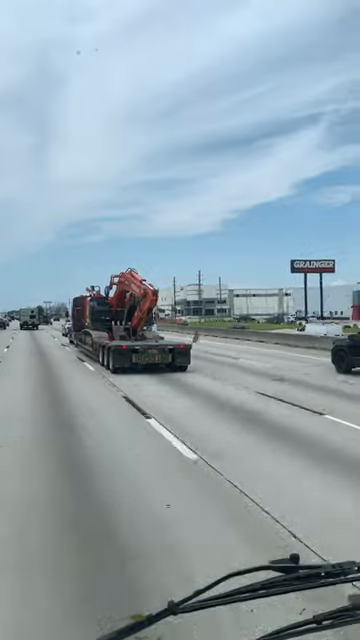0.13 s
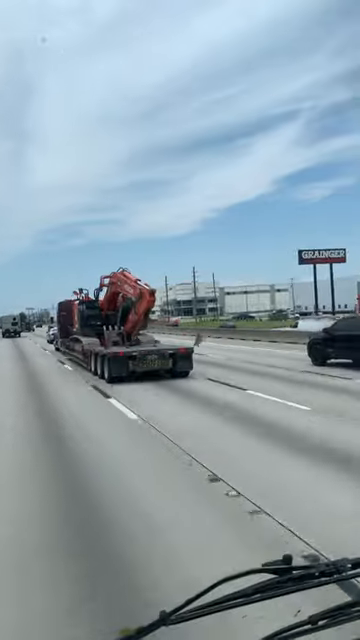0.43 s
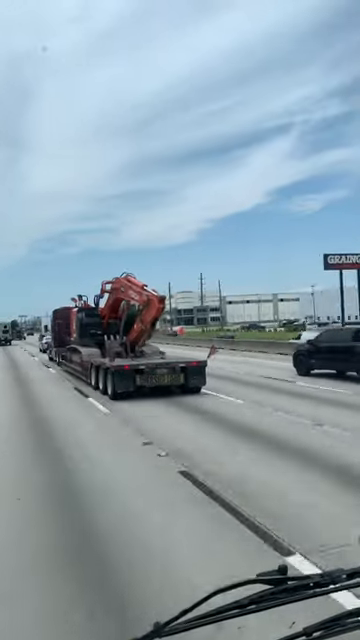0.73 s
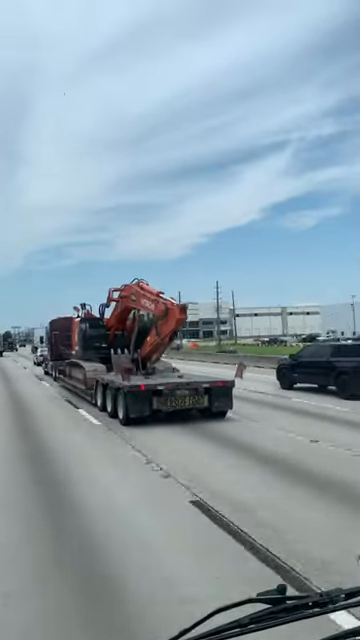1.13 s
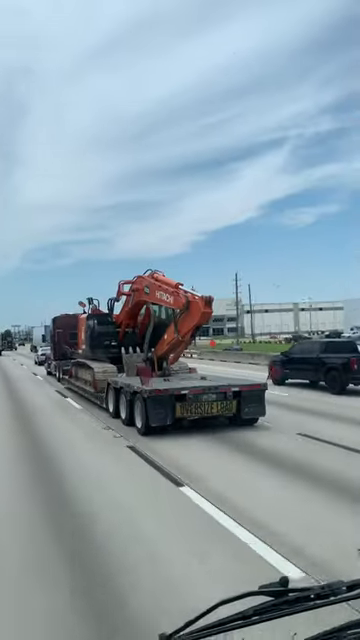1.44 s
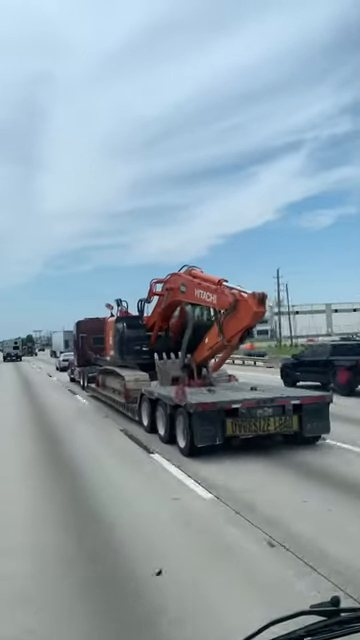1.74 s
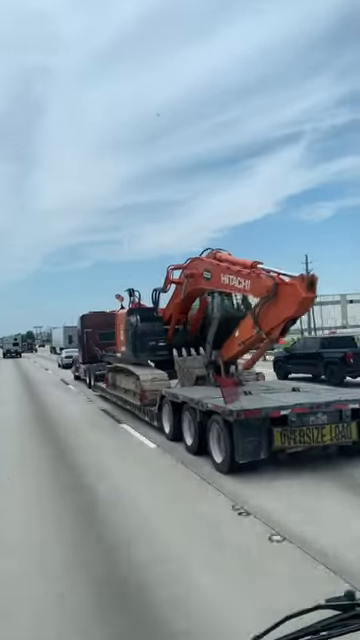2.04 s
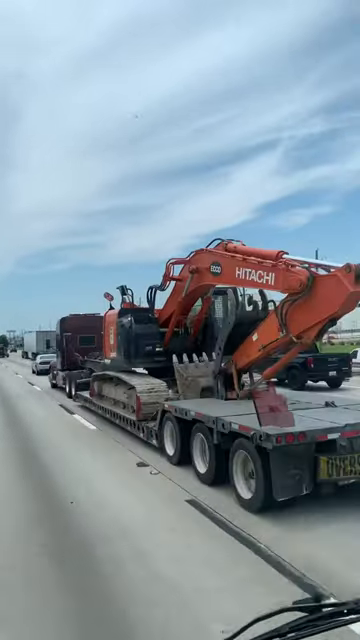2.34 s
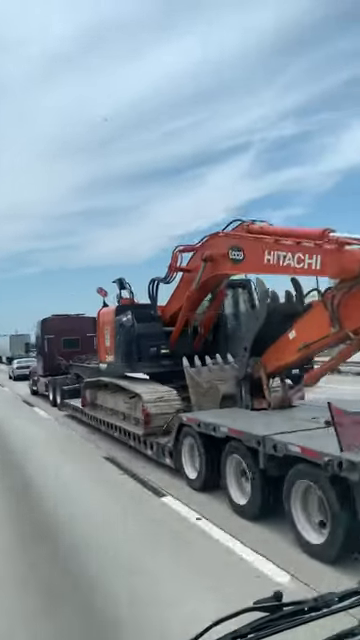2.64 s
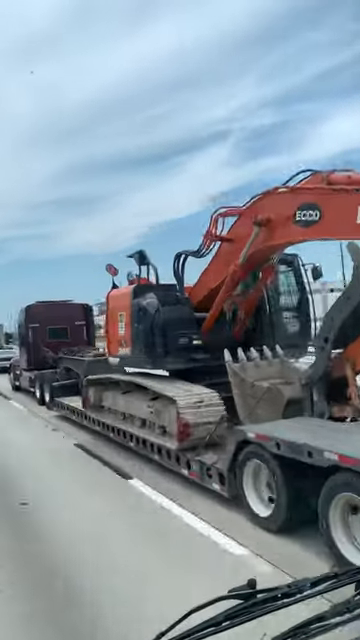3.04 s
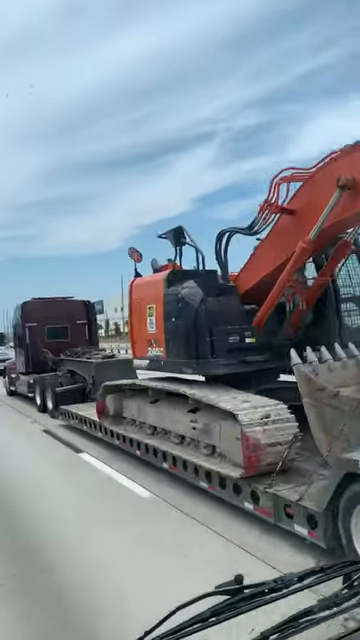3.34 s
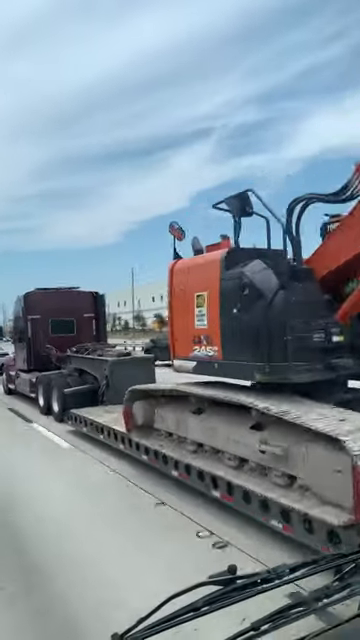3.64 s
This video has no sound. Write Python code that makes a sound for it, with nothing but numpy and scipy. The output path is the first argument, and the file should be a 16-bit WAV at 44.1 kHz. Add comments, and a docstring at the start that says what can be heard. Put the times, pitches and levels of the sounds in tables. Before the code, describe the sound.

Continuous low road and engine rumble fills a truck cab on a concrete highway, with flickering tyre roar, faint air hiss and wavering tread whine. A low hum bumps up briefly at 1 s, then stays strong from 1.5 s. Tiny rattles tick from 1.4 s to 2.6 s; a deep shudder surges near 2 s. The trailer's tyres grow towards 3.3 s, with two faint short tones at 3.3 and 3.7 s.

```python
"""Inside the cab of a truck cruising on a concrete highway while it draws up to a low-loader.
From the start, shaped noise booms in the cab, roars from the tyres and hisses past the glass; wavering
sines make the tread whine and a hum that leaps up at 1 s and again from 1.5 s. Filtered clicks rattle
from 1.4 s, the shudder surges near 2 s as an upper whine joins, and the low-loader's tyres grow
towards 3.3 s. Two short tones come last; a two-port phone microphone hears it all."""
import sys
import numpy as np
from scipy import signal
from scipy.fft import rfft, irfft, next_fast_len
from scipy.io import wavfile
from scipy.ndimage import uniform_filter1d

SR = 44100
rng = np.random.default_rng(int(sys.argv[2]) if len(sys.argv) > 2 else 0)


def int16_out(signal):
    """Quantize to a 16-bit WAV file."""
    q = np.round(np.clip(np.atleast_2d(signal).T, -1, 1) * 32767)
    wavfile.write(sys.argv[1], SR, q.astype(np.int16))


N = 166257

# Road layers: (time [s], cab boom [dB], tyre roar [dB], air hiss [dB], deep shudder [dB],
# low-loader tyres [dB])
ROAD_LEVELS = [(0, -18.5, -23, -37, -26, -37), (.45, -15.5, -23.5, -38, -19.5, -37),
               (.85, -17, -23, -38, -22.5, -42), (1.2, -17.5, -23, -40, -25, -39),
               (1.6, -16.5, -23.5, -37, -26.5, -34), (1.95, -16.5, -22.5, -36, -16, -35),
               (2.4, -18, -24, -35.5, -19.5, -35), (2.85, -19.5, -24.5, -37.5, -21, -31.5),
               (3.3, -16.5, -24.5, -35, -23, -27), (3.77, -19, -24.5, -37, -23, -27)]
# Noise colours before the panels ring: (frequency [Hz], density [dB per Hz])
SHUDDER_COLOUR = [(18, -29), (30, -16), (55, -4.5), (70, -5), (95, -37)]
BOOM_COLOUR = [(55, -19), (72, -6), (84, 3), (102, -7), (150, -3.5), (200, -9), (280, -13.5), (400, -20.5),
               (600, -32)]
ROAR_COLOUR = [(200, -29), (320, -7.5), (450, 0), (700, -5), (1000, -3.5), (1400, -3.5), (1800, -5.5),
               (2300, -11), (2800, -21), (4000, -24.5)]
LOADER_COLOUR = [(600, -12), (800, -2.5), (1050, -1), (1400, -4)]
HISS_COLOUR = [(1200, -12), (2000, 0), (3300, 0), (5400, -3.3), (8000, -9), (9500, -10.5), (12100, -12),
               (12800, -19), (16000, -20.5)]
# Resonant peaks in the cab noise: panels ring, and at 369 Hz a wide, patchy tread tone sounds: (centre [Hz],
# width [Hz], boost [dB])
PANELS = [(150.6, 14.4, 4), (255, 47, 1.5), (369, 12, 9.5), (534, 37, 4.5)]

# Share of the noise that both ports hear alike: (frequency [Hz], share [0-1])
PORT_ALIKE = [(100, .9995), (190, .985), (330, .88), (600, .45), (900, .15), (1250, .2), (1600, .65),
              (2400, .8), (3200, .7), (4300, .993), (16000, .999)]
# Phase lead of the left port: (frequency [Hz], lead [rad])
PORT_LEAD = [(0, 0), (500, .33), (1550, 1.2), (2400, 2.5), (3500, 1.8), (4750, 3.14), (6850, 6.28),
             (16300, 20.4)]
# Left port against right: (frequency [Hz], level [dB])
PORT_TILT = [(150, 0), (300, -3), (700, 0)]

# Swells of the low hum: (time [s], level [dB])
HUM_LEVELS = [(0, -33.5), (.95, -35), (1.06, -19), (1.2, -35), (1.55, -17.5), (1.9, -19), (2.05, -13),
              (2.6, -16.5), (2.72, -18), (2.95, -18), (3.77, -14)]
# Road speed as the pitch of the main tread whine: (time [s], pitch [Hz])
TREAD_PITCH = [(0, 527.4), (1.4, 516.7), (1.9, 523.6), (3.3, 512.6), (3.77, 508.4)]
# Main, upper and top tread whine, each: (time [s], level [dB])
MAIN = [(.12, -24), (.16, -38), (.26, -38), (.29, -24), (.6, -28), (1.2, -29), (1.4, -27), (1.55, -33),
        (1.82, -36), (1.86, -24), (2.38, -27), (2.48, -34), (2.55, -27), (2.85, -30), (3.26, -29),
        (3.32, -45)]
UPPER = [(1.96, -46), (2.0, -36), (2.12, -44), (2.3, -39), (2.6, -44), (2.8, -33), (2.95, -41), (3.5, -39),
         (3.77, -40)]
TOP = [(0, -35), (.49, -40), (.515, -24), (.64, -26), (.7, -30), (.94, -30), (.98, -48), (1.75, -45),
       (1.9, -35), (2.33, -33), (2.42, -44), (3.2, -38), (3.35, -48)]
# The whines: (level table, multiple of tread pitch [ratio], pitch waver [share], flutter [dB],
# blur [dB], left lead [rad])
WHINE_KINDS = [(MAIN, 1.0, .004, 1.3, -6, .9), (UPPER, 1.935, .016, 2.5, 3, 1.2),
               (TOP, 2.708, .002, 1.5, -8, 1.3)]
# Short late tones: (start [s], length [s], pitch [Hz], level [dB])
LATE_TONES = [(3.338, 0.19, 593, -31.5), (3.675, 0.12, 595, -32.5)]
# Small rattles: (start [s], level [dB], decay time [s])
RATTLES = [(1.368, -41, .02), (1.885, -42, .03), (2.44, -34.5, .016), (2.553, -39, .016)]

HUM_HZ, HUM_WAVER = 121.36, 0.0047  # pitch, and its waver as a share of it
BLUR_HZ = 44.67  # how fast the skirt around a tone wanders
RATTLE_HZ, RATTLE_TOP_HZ = 5500, 10000  # low and high edges of the rattle
RATTLE_CLICKS_PER_S = 1800
START_S, FADE_S = .0355, .004  # when the microphone opens, and how long its fade-in takes
DRIVE = 0.56  # how hard peaks are rounded
TOP_HZ = 15720  # edge of the treble cut

T = np.arange(N) / SR  # time [s]
M = next_fast_len(N + SR // 10)  # padded transform length [samples]
F = np.maximum(np.arange(M // 2 + 1) * SR / M, 1)  # transform frequencies [Hz]


def undb(db):
    """Gain from decibels."""
    return 10 ** (np.asarray(db) / 20)


def curve(table, column=1):
    """One column of a table, drawn as straight lines over time."""
    rows = np.array(table)
    return np.interp(T, rows[:, 0], rows[:, column])


def over_hz(table):
    """A table over frequency, joined on a log axis."""
    rows = np.array(table)
    return np.interp(np.log(F), np.log(np.maximum(rows[:, 0], 1)), rows[:, 1])


def walk(rate):
    """Random levels held 1 / rate s and slewed twice; spread near 1."""
    hold = int(SR / rate)
    steps = np.repeat(rng.standard_normal(N // hold + 1), hold)
    slewed = uniform_filter1d(uniform_filter1d(steps, hold), hold)
    return 1.273 * slewed[:N]


def ports(shared, other):
    """Two ports: a common part with a phase lead on the left, plus a second part in opposite signs."""
    rows = np.array(PORT_LEAD)
    lead = np.interp(F, rows[:, 0], rows[:, 1])
    # half the lead and tilt goes to each port
    turn = np.exp(.5j * lead) * undb(over_hz(PORT_TILT) / 2)
    alike = over_hz(PORT_ALIKE)
    common = rfft(shared, M) * np.sqrt((1 + alike) / 2)
    apart = rfft(other, M) * np.sqrt((1 - alike) / 2)
    return irfft(np.array([(common + apart) * turn, (common - apart) / turn]), M)[:, :N]


def panel_boost():
    """Resonant peaks where the cab panels ring, and a patchy tread tone near 369 Hz, in dB over frequency."""
    return sum(boost / (1 + (2 * (F - hz) / width) ** 2) for hz, width, boost in PANELS)


def rush(colour, swell_db, swell_rate, flicker_db, flicker_rate, count=3):
    """Noise bands (count to the octave) through the panels, swelling together, flickering alone; rms 1."""
    low_hz, high_hz = colour[0][0], colour[-1][0]
    shape = undb(over_hz(colour) + panel_boost()) * (F > low_hz / 2)
    noise = rfft(rng.standard_normal((2, M))) * shape
    swell = swell_db * walk(swell_rate)
    total = 0
    first_step = np.floor(count * np.log2(low_hz)) - 2
    for step in np.arange(first_step, count * np.log2(high_hz) + 1):
        # neighbouring bands crossfade and add up to one
        band = np.cos(np.pi / 2 * np.clip(count * np.log2(F) - step, -1, 1)) ** 2
        flicker = flicker_db * walk(flicker_rate)
        total = total + irfft(noise * band, M)[:, :N] * undb(swell + flicker)
    both = ports(total[0], total[1])
    return both / np.std(both)


def tone(hz, level_db, waver, blur_db, lead):
    """A sine of given rms level whose pitch wavers, with a skirt of narrow noise around it."""
    phase = 2 * np.pi * np.cumsum(hz * (1 + waver * walk(14))) / SR
    wander = (walk(BLUR_HZ) + 1j * walk(BLUR_HZ)) / np.sqrt(2)
    skirt = 1 + undb(blur_db) * wander
    port_phase = np.array([[lead / 2], [-lead / 2]])
    return np.sqrt(2) * undb(level_db) * np.imag(skirt * np.exp(1j * (phase + port_phase)))


def shudder():
    """Deep shudder of the cab: the lowest noise, surging with the level table."""
    return rush(SHUDDER_COLOUR, .5, 4, .5, 8, count=2) * undb(curve(ROAD_LEVELS, column=4))


def boom():
    """Cab boom: low road rumble in slowly swelling bands."""
    return rush(BOOM_COLOUR, 1.0, 4.7, 1.9, 6.24, count=6) * undb(curve(ROAD_LEVELS, column=1))


def tyre_roar(colour, column):
    """Tyre roar: mid-range noise in narrow bands that flicker apart as shifting streaks."""
    return rush(colour, 1, 12, 3.2, 15, count=10) * undb(curve(ROAD_LEVELS, column))


def air_hiss():
    """Air past the glass: bright noise with a light flicker."""
    return rush(HISS_COLOUR, .7, 12, 1.1, 14) * undb(curve(ROAD_LEVELS, column=3))


def road():
    """Shudder and boom of the cab, roar of own and low-loader tyres, hiss of the air."""
    own_tyres = tyre_roar(ROAR_COLOUR, column=2)
    loader_tyres = tyre_roar(LOADER_COLOUR, column=5)
    return shudder() + boom() + own_tyres + loader_tyres + air_hiss()


def hum():
    """The low engine-like note that fills the cab: a wavering sine, swelling unevenly."""
    level = curve(HUM_LEVELS) + 1.3 * walk(18)
    return tone(HUM_HZ, level, HUM_WAVER, blur_db=-9, lead=.02)


def tread_whines():
    """Tread whines: fluttering tones at fixed multiples of a pitch that follows road speed."""
    total = 0
    for levels, multiple, waver, flutter_db, blur_db, lead in WHINE_KINDS:
        level = curve(levels) + flutter_db * walk(13)
        total = total + tone(multiple * curve(TREAD_PITCH), level, waver, blur_db, lead)
    return total


def rattles():
    """Loose trim: random clicks with a short ring, kept bright and let through in decaying bursts."""
    gate = sum(undb(db) * (T > start) * np.exp(-np.abs(T - start) / decay) for start, db, decay in RATTLES)
    clicks = rng.standard_normal(N) * (rng.random(N) < RATTLE_CLICKS_PER_S / SR)
    ring = rng.standard_normal(60) * np.exp(-np.arange(60) / 20)  # in samples
    ringing = np.convolve(clicks, ring)[:N]
    edges = np.sqrt((1 + (RATTLE_HZ / F) ** 4) * (1 + (F / RATTLE_TOP_HZ) ** 4))
    bright = irfft(rfft(ringing, M) / edges, M)[:N]
    return ports(gate * bright / np.std(bright), np.zeros(N))


def late_tones():
    """Short blurred tones near the end, each with straight fades in and out."""
    total = 0
    for start, length, hz, db in LATE_TONES:
        to_edge = np.minimum(T - start, start + length - T)
        fade = np.clip(to_edge / 0.014, 0, 1)  # 14 ms
        total = total + tone(hz, db, waver=0.0044, blur_db=-1, lead=0.32) * fade
    return total


def scene():
    """Everything in the cab."""
    return road() + hum() + tread_whines() + rattles() + late_tones()


def record(dry):
    """The phone opens after a moment, rounds the loudest peaks and cuts the top."""
    rounded = np.tanh(DRIVE * dry) / DRIVE
    opened = rounded * np.clip((T - START_S) / FADE_S, 0, 1)
    # steep low-pass: 0.2 dB ripple below the edge, 80 dB down above it
    top_cut = signal.ellip(16, .2, 80, TOP_HZ, fs=SR, output="sos")
    return signal.sosfilt(top_cut, opened)


dry = scene()
out = record(dry)
int16_out(out)
```